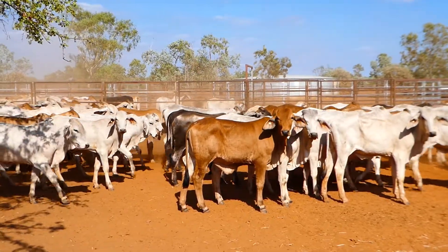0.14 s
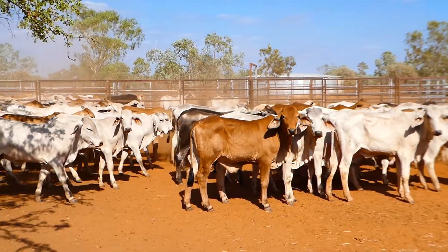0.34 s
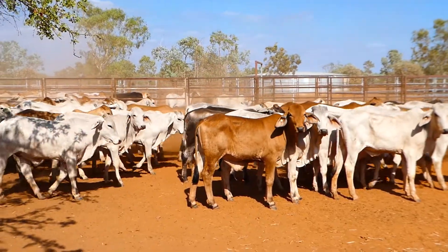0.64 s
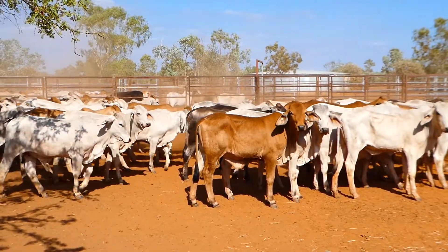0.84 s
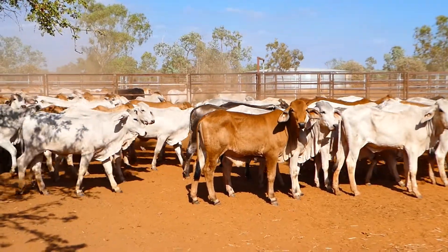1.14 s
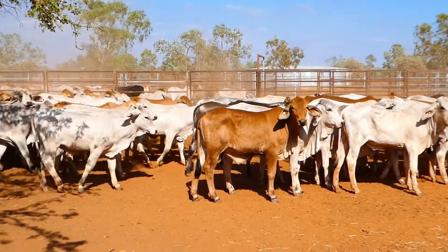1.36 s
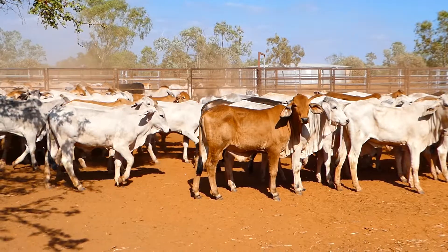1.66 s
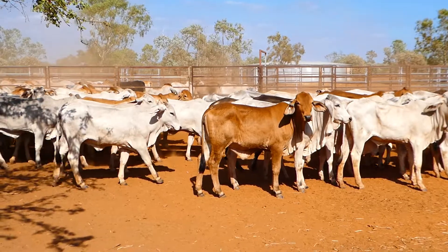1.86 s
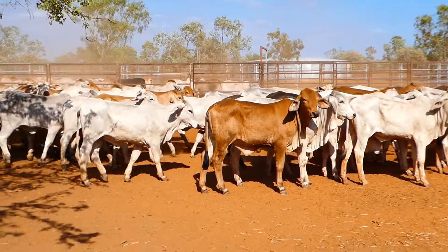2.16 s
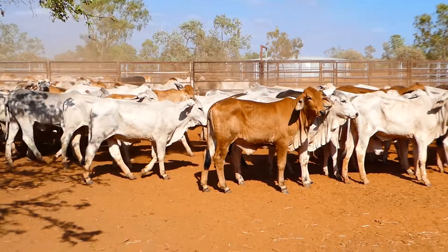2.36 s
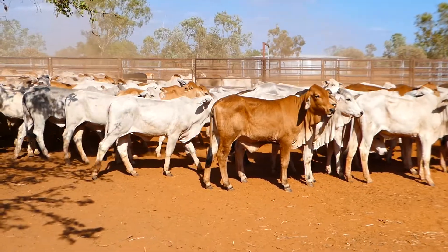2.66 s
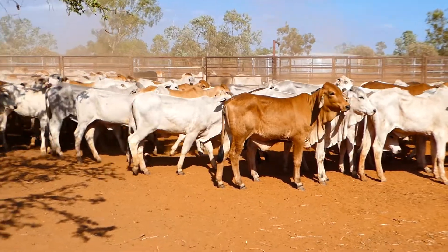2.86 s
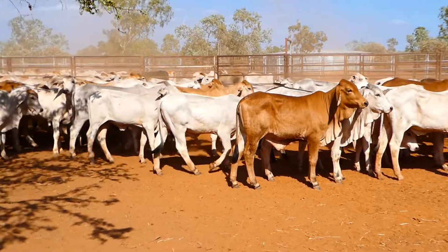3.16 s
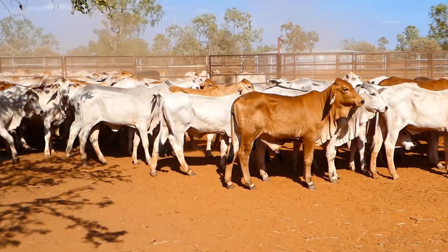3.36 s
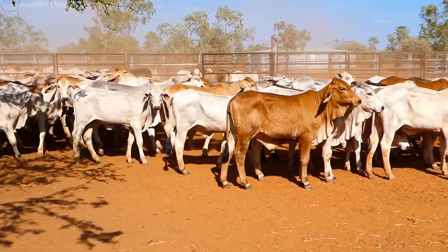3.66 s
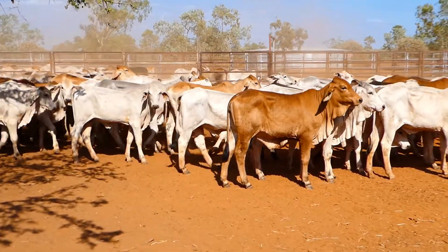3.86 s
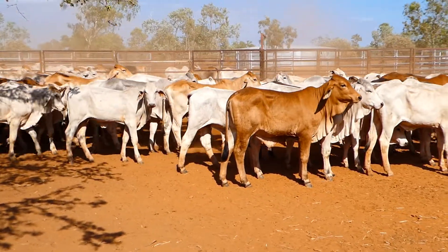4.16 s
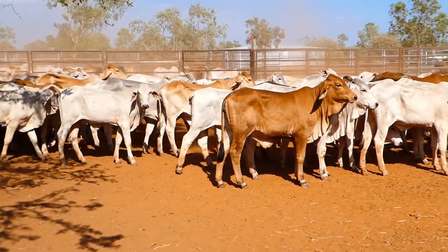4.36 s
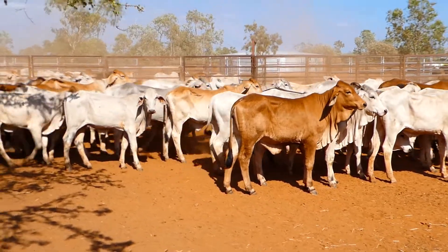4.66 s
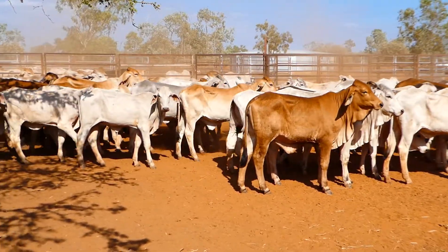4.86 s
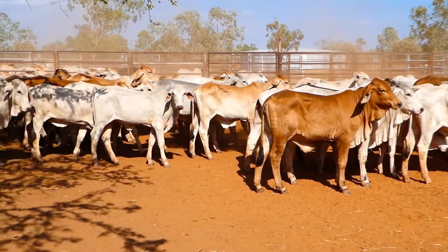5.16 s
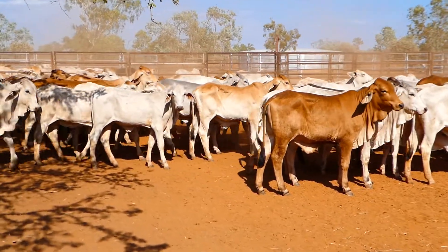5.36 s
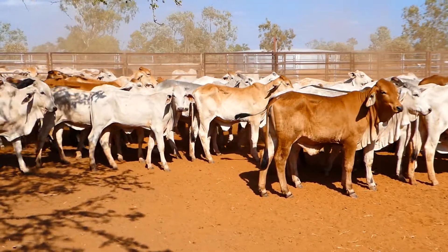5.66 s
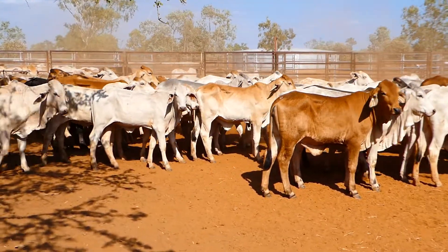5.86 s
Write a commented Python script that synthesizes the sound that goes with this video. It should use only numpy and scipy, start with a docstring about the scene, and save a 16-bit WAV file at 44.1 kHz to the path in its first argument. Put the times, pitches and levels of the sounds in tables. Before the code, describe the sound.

Four drawn-out moos follow one another in an open cattle yard, three near the microphone on the right and one farther ahead. The first is deep and falling, the distant one overlaps the loudest, which rises and drops, and the last fades to a low creak. Beneath them are light wind buffets, soft hoof scuffs in dirt, a few sharp hoof knocks and faint, distant bird chirps.

```python
"""Four cows low in a dirt yard, one call running into the next: three near on the right, one far ahead.
Each call is a train of vocal-fold pulses and breath ringing chest, mouth, upper throat and nose,
with echoes off flanks and fences. Gusts buffet the two microphone ports, hooves scuff and knock
on the ground, and small birds chirp far off over the faint hiss of the yard."""
import sys
import numpy as np
from scipy import signal
from scipy.fft import rfft, irfft, next_fast_len
from scipy.io import wavfile
from scipy.ndimage import uniform_filter1d

SR = 44100
rng = np.random.default_rng(int(sys.argv[2]) if len(sys.argv) > 2 else 0)


def output_pcm(signal):
    """Save a mono or channel-first signal as 16-bit PCM at the path in sys.argv[1].

    Samples are clipped to [-1, 1] before scaling.
    """
    pcm = np.clip(np.atleast_2d(signal).T, -1, 1) * 32767
    wavfile.write(sys.argv[1], SR, np.round(pcm).astype(np.int16))


N = 265482


def herd():
    """Three cows near the microphone on the right, one farther ahead, and their echoes."""
    # calls: (time [s], pitch [Hz], mouth level [dB], chest hum, upper throat, nasal rasp [dB over mouth],
    # higher mouth rings [dB over the lowest], lip spread raising the rings [%])
    long_call = [(.03, 76.9, -35, -2, -16.5, -44, -1.5, 7), (.16, 80.97, -33.5, 4.5, -16.5, -55, 2, 6),
                 (.3, 84.15, -32, -1, -15.5, -34, 0, 7), (.59, 84.77, -24, -7, -16, -26.5, -1.5, 6),
                 (.75, 82.3, -25.5, 3, -11, -23.5, 1, 6), (.83, 79.4, -19.5, -2.5, -17.5, -25.5, -0.5, 2.5),
                 (.93, 68.56, -20, -3, -15.5, -34.5, -2, 1.5), (1.06, 57.6, -20, -5, -22.5, -45, 0.5, 5.5),
                 (1.27, 53.98, -23, -4, -20.5, -35, -1.5, 2.5),
                 (1.45, 51.88, -24.5, -4.5, -24.5, -38, -2.5, 7),
                 (1.7, 50.56, -27.5, -2.5, -22.5, -33.5, 0.7, 6),
                 (1.96, 48.76, -28, -1.5, -24.5, -35.5, 1, -1.5),
                 (2.09, 47.77, -36.5, 4.5, -17, -26, 7, -0.5), (2.42, 44.43, -45, 12, -19, -44, 5.5, -1)]
    loud_call = [(2.651, 86.75, -21, -8.5, -28.5, -37, -5, 2),
                 (2.8, 100.8, -17.5, -5, -22.5, -38.5, -4, 0.7),
                 (2.94, 111.4, -18, -10, -16.5, -33, 2, -0.5),
                 (3.08, 120.1, -15, -11.5, -22, -36.5, -4, 0.2),
                 (3.22, 123.1, -17.5, -5, -10.5, -26.5, -0.1, -1),
                 (3.4, 124.3, -20, -3, -8.5, -25, 1.5, -1), (3.56, 122.3, -17, -5.5, -11, -26.5, -1, 0),
                 (3.74, 119, -14.5, -9, -19, -34.5, -2.2, 2), (3.82, 106.9, -17.5, -10, -18, -39, -0.7, 2),
                 (3.92, 80.5, -20, -7.5, -25, -41, -2.3, 1), (3.965, 65.3, -24, -11, -23, -56, -0.5, 1),
                 (4.04, 61.8, -31.5, 1.5, -16, -33, -6.5, -5.5)]
    last_call = [(3.96, 127.7, -34.5, 7, -10, -33, 6.5, -1.5), (4.06, 124.5, -29, 8.5, -9.5, -37, 8.5, 1),
                 (4.14, 119, -24.5, -0.5, -13.5, -38, 8.5, 2),
                 (4.26, 106.7, -31, 11.5, -13, -34.5, 5.5, -1.7),
                 (4.34, 98.85, -24, 3.5, -21.5, -31, 6, -3),
                 (4.45, 90.23, -22.5, -1, -20.5, -38, 2.5, -1.5),
                 (4.536, 83.3, -26, 4, -21.5, -30, 7.5, 1.5),
                 (4.694, 60.46, -32.5, 2, -20.5, -29, -0.5, -1),
                 (4.77, 55.04, -40.5, 11, -29, -49, -15, -0.32), (4.82, 54.64, -53, 8, -19, -46, -8, 1.5),
                 (4.87, 53.06, -41, 7, -13, -46, -2.5, 0.96), (5.138, 46.65, -55.5, 15.5, -21, -48, -5, 10),
                 (5.23, 41.2, -60, 6, -24, -48, 5, -2)]
    far_call = [(1.98, 96.6, -37, 4.2, -32, -36, .4, 0.37), (2.25, 108.1, -35, 1.3, -13, -37, 0.29, 0.5),
                (2.49, 104, -35.5, 9, -12.5, -33, 0.32, 0.49),
                (2.7, 107.2, -32.5, 1.2, -11, -25.5, .4, 0.47),
                (3.02, 112, -37, 5.4, -7.5, -19, 0.25, 0.35)]
    # rings of chest, mouth, upper throat and nose, a list each: (frequency [Hz], width [Hz], level [dB])
    long_throat = [
        [(314.6, 47.5, 5.5), (408, 115, -13)],
        [(684.7, 56, 25), (948, 105, 14), (1073, 98, 20), (1226, 124, 10), (1365, 67, 12.5)],
        [(1910, 140, 10.5), (2200, 800, 8), (2904, 67, 8.5)],
        [(3690, 210, 0.5), (4451, 950, -2.5), (5140, 440, -3), (6020, 309, -2)],
    ]
    loud_throat = [
        [(296.2, 59, -12.5)],
        [(792, 60, 8), (981.5, 170, 1), (1282, 137, -11.5)],
        [(2020, 260, -0.5), (2337, 119, 11.5), (2894, 237, -1)],
        [(3788, 370, 1), (4627, 200, 0), (5830, 740, 1), (6610, 140, 7), (9640, 1500, -12.5)],
    ]
    last_throat = [
        [(261, 85, -0.5), (338.5, 46.5, 17), (465, 39, 4)],
        [(678, 86, 12.5), (1013, 124, 2.9), (1227, 65, 1.3)],
        [(1850, 340, 16.7), (2064, 380, 12.6), (2530, 870, 10), (2870, 120, 1.5)],
        [(4480, 3400, 0)],
    ]
    far_throat = [
        [(338, 95, 9.5), (465, 62, -3)],
        [(767, 140, 0.018), (1046, 116, 0.031)],
        [(1445, 51, 17.6), (1892, 220, 11), (2294, 120, 2)],
        [(4350, 740, 0)],
    ]
    near, far = np.zeros(N), np.zeros(N)
    add(near, *moo(long_call, long_throat, sink=.15, slap=.2, breath=3.7, lip_db=.17, lip_rise=.45))
    add(near, *moo(loud_call, loud_throat, sink=.024, slap=.55, breath=1.44, lip_db=2.5, lip_rise=3.5))
    add(near, *moo(last_call, last_throat, sink=.175, slap=0, breath=3, lip_db=.5, lip_rise=1.1))
    add(far, *moo(far_call, far_throat, sink=.1, slap=0, breath=4.5, lip_db=3, lip_rise=-.2))
    return ports(flanks(near), rightness=.52) + ports(far, rightness=.056) + amp(-19) * fences(near + far)


def moo(call, throat, sink, slap, breath, lip_db, lip_rise, nose_hz=518.4, nose_width_hz=93):
    """Fold pulses and puffs of air ring chest, mouth, upper throat and nose; gives (start [s], sound)."""
    times, *columns = np.transpose(call)
    t = np.arange(times[0], times[-1], 1 / SR)
    hz, mouth_db, chest_db, upper_db, rasp_db, front_db, spread = (np.interp(t, times, c) for c in columns)
    hz = uniform_filter1d(hz, size=1500)
    slack = np.log2(hz.max() / hz)  # octaves under the top of the call
    cycles, rough, pulses, doubled = vocal_folds(t, hz, slack, slap)
    puffs = evened(np.exp(-(cycles % 1) / .5) * rng.standard_normal(len(t)))
    # rings sink as the pitch falls and rise as the lips spread
    chest, (low, *front), (*upper, (top_hz, top_width, top_db)), nose = throat
    lift = 1 + spread / 100
    low_hz = low[0] * lift * (1 - .26 * sink * slack)
    swung_hz = low_hz * (1 - .075 * slack * np.sin(2 * np.pi * cycles))  # slack folds swing this ring
    chest = [(f * (1 - sink * slack), w, g) for f, w, g in chest]
    mouth = [(swung_hz, *low[1:])] + [(f, w, g + front_db) for f, w, g in front]
    upper = [(f * (1 - .2 * sink * slack), w, g) for f, w, g in upper]
    upper.append((top_hz * (1 + lip_rise * spread / 100), top_width, top_db + lip_db * spread))
    nose = [(f * lift, w, g) for f, w, g in nose]
    # higher parts carry more breath, and tongue and lips never hold them still
    parts = [(chest, doubled, amp(chest_db), .015, 0, 1.95),
             (mouth, doubled, -1, .03, .004, 4.2),
             (upper, pulses, amp(upper_db), .11, .012, 3.3),
             (nose, pulses, amp(rasp_db), .4, .01, 1.8)]
    voice = np.zeros(len(t))
    for modes, folds, gain, air, wander, skirt in parts:
        drive = folds + (breath * air * (105 / hz) + 2.15 * rough) * puffs  # slow folds leak more air
        rings = 0
        for ring_hz, width, db in modes:
            level = amp(db + 140 * wander * drift(14, len(t)))
            wandering_hz = ring_hz * (1 + wander * drift(5, len(t)))
            rings += level * resonate(drive, wandering_hz, width, skirt, crest_s=.0012)
        voice += gain * evened(rings)
    # slack folds let the windpipe swallow a band just over the lowest mouth ring
    voice -= np.clip(3.2 * (slack - .25), 0, 1) * resonate(voice, 1.174 * low_hz, width=56)
    voice = rolloff(voice, "high", hz=190, order=2)  # the head radiates little bass
    nose_notch = signal.iirnotch(nose_hz, nose_hz / nose_width_hz, fs=SR)  # the nose swallows this band
    voice = signal.lfilter(*nose_notch, voice)
    fade = signal.windows.tukey(len(t), .014 / (times[-1] - times[0]))
    return times[0], amp(mouth_db) * voice * fade


def vocal_folds(t, hz, slack, slap, jitter=.0027, taut_octaves=.17):
    """Folds shut once a cycle; taut near the top pitch, they can slap again in mid-cycle."""
    flutter = slap * np.clip(1 - slack / taut_octaves, 0, 1) ** .5
    rough = np.clip(.17 * -np.gradient(np.log(hz)) * SR, 0, 1) ** 2  # folds lose step as pitch collapses
    cycles = np.cumsum(hz * (1 + (jitter + .1 * rough) * drift(66, len(t)))) / SR
    shut = np.flatnonzero(np.diff(np.floor(cycles))) + 1
    late = (cycles[shut] % 1) / (cycles[shut] - cycles[shut - 1])  # samples since the folds shut
    pulses = np.zeros(len(t) + 8)
    for k in range(8):
        offset = k - 4 + late
        pulses[shut + k] += np.sinc(offset) * np.cos(np.pi * offset / 10) ** 2
    # rough or twice-slapping folds close hard and soft by turns, and unevenly
    limp = rough + .24 * flutter * (1 + .5 * drift(5.6, len(t)))
    force = (1 + limp * np.cos(np.pi * np.floor(cycles))) * amp((.4 + 1.8 * rough) * drift(90, len(t)))
    pulses = pulses[4:-4] * np.sqrt(SR / hz) * force
    doubled = pulses + flutter * np.interp(t - .5 / hz, t, pulses)
    return cycles, rough, pulses, doubled


def flanks(x, treble_hz=1500):
    """Quick reflections between crowded, shifting bodies smear the treble of each pulse."""
    delay, t = np.arange(round(.031 * SR)) / SR, np.arange(N) / SR
    paths = rng.standard_normal((4, len(delay))) * np.exp(-delay / .012) * (delay > .001)
    paths = rolloff(paths / np.linalg.norm(paths[0]), "high", treble_hz, order=3)
    fades = [np.sin(np.pi * (t / .9 + k / 4)) ** 2 / np.sqrt(1.5) for k in range(4)]
    smear = sum(signal.oaconvolve(x * fade, path)[:N] for fade, path in zip(fades, paths))
    return .7 * x + .3 * rolloff(x, "low", treble_hz, order=3) + .4 * smear


def fences(x, t60=.16):
    """Scattered echoes off fences and flanks: sparse taps of random sign, dulled in the treble."""
    size = SR // 2
    taps = np.zeros((2, size))
    at = np.arange(400, size - 20, 20) + rng.integers(0, 20, (2, (size - 401) // 20))
    np.put_along_axis(taps, at, rng.choice([-1., 1.], at.shape), 1)
    decay = amp(-60 * np.arange(size) / SR / t60)
    taps = signal.lfilter([1], [1, -.7], taps * decay)
    return signal.fftconvolve(x[None], taps / np.linalg.norm(taps[0]), axes=1)[:, :N]


def ports(x, rightness):
    """Level and phase between the microphone ports part more, the farther right the source stands."""
    # shading of a source fully to the right: (frequency [Hz], left minus right [dB])
    shading = [(200, 3), (320, -0.5), (490, -1), (740, -9.5), (1130, -14.5), (1710, -24.5), (2600, -12),
               (5000, -13.5), (9000, -4.5)]
    # its phase across the ports: (frequency [Hz], left lead [rad])
    lead = [(100, 1), (400, -0.36), (860, -1.1), (1550, -0.36), (2760, -0.83)]
    size = next_fast_len(N)
    hz = np.fft.rfftfreq(size, 1 / SR)
    left = amp(rightness * curve(shading, hz) / 2) * np.exp(.5j * rightness * curve(lead, hz))
    return irfft(rfft(x, size) * np.array([left, 1 / left]), size)[:, :N]


def wind(likeness=.66, buffet_s=.0073):
    """Wind on the microphone: lumpy rumble, partly its own at each port, and buffets of a few cycles."""
    # breeze under the gusts: (time [s], level [dB])
    breeze = [(0, -51.5), (3.899, -50.5), (4.3, -73), (5.101, -72), (5.55, -62), (6.02, -43)]
    # gusts: (start [s], length [s], peak [dB])
    gusts = [(0.0, 0.12, -35.5), (0.174, 0.22, -34), (1.27, 0.46, -37.5), (1.977, 0.11, -49),
             (2.134, 0.23, -31), (2.36, 0.23, -28), (3.238, 0.24, -46), (5.544, 0.16, -52),
             (5.71, 0.33, -35.5)]
    # single buffets on the ports: (time [s], peak [dB], pitch [Hz], left minus right [dB])
    buffets = [(0.001, -26, 319, -19), (0.014, -18, 247, 5), (0.212, -9, 268, -0.5), (0.234, -16, 173, 8),
               (0.251, -14, 223, -3), (2.218, -20, 220, -11), (2.239, -19, 256, 12), (2.298, -18, 305, 0),
               (2.457, -22, 310, 0), (2.518, -22.5, 317, 2), (5.586, -28.5, 183, -2), (5.636, -35, 240, 0),
               (5.766, -25, 236, -5), (5.79, -23.5, 146, 5), (5.867, -26, 149, 9), (5.885, -12.5, 150, 0),
               (5.909, -21, 201, -6), (5.932, -19, 241, 8), (5.973, -21.5, 204, 5)]
    level = amp(np.interp(np.arange(N) / SR, *np.transpose(breeze)))
    for start, length, db in gusts:
        add(level, start, amp(db) * signal.windows.tukey(round(length * SR), .74))
    left, own = rng.standard_normal((2, N))
    right = likeness * left + np.sqrt(1 - likeness ** 2) * own
    rumble = np.array([resonate(port, hz=100, width=222) for port in (left, right)])
    rumble = rolloff(rumble, "high", hz=95, order=3)
    lumps = amp(5.5 * drift(19, N) + 7.5 * drift(22, (2, N)))
    out = evened(rumble * lumps) * level
    t = np.arange(0, 3 * buffet_s, 1 / SR)
    age = t / buffet_s
    swell = 3 * age * np.exp(1 - 3 * age)
    for (at, peak_db, hz, pan_db), (phase, lead) in zip(buffets, rng.random((len(buffets), 2))):
        port_phase = phase + lead * np.array([[0], [.38]])
        wave = np.sin(2 * np.pi * (hz * t * (1 - .034 * age) + port_phase))
        flap = resonate(rng.standard_normal(len(t)), 1.78 * hz, width=127)  # the edge of the gust flaps
        add(out, at, panned(peak_db, pan_db) * swell * (wave + .17 * evened(flap)))
    return out


def hoof_scuffs(air_hiss_db=-61.5, grains_per_s=400):
    """Hooves drag through gritty dirt over a steady, faint high hiss of air."""
    # drags: (start [s], level [dB], length [s])
    scuffs = [(0.973, -59, 0.057), (1.31, -59.5, 0.091), (1.483, -61, 0.044), (2, -68, 0.11),
              (2.456, -62, 0.069), (2.933, -58.5, 0.071), (3.688, -59, 0.061), (4.018, -71, 0.21),
              (4.418, -69, 0.21)]
    # spectrum of the scuffs and the hiss: (frequency [Hz], relative level [dB])
    spectrum = [(900, -47), (2500, -7.5), (5000, -5), (10000, -8), (13000, -11.5), (15500, -30.5)]
    level = np.full(N, amp(air_hiss_db))
    for start, db, length in scuffs:
        add(level, start, amp(db) * np.hanning(round(length * SR)) ** .5)
    grains = amp(3 * np.minimum(rng.exponential(1, N), 4)) * (rng.random(N) < grains_per_s / SR)
    grit = 1 + .15 * evened(signal.lfilter([1], [1, -.98], grains))
    return level * evened(hiss(spectrum, likeness=[(1000, .88), (6000, .69), (11000, .11)]) * grit)


def hoof_knocks():
    """Hooves strike hard ground, each ringing as a thud, a clack and a tick with a gritty tail."""
    # steps: (time [s], level [dB], thud, clack, tick [dB over that level], left minus right [dB])
    steps = [(0.289, -48, 3, -18, -11, 4), (1.7946, -26, 0, -8, -1.5, -4.0),
             (4.79, -33.5, -13, -7, -37, -1.5), (5.6744, -25, -34, -2.5, -13, 1.5),
             (5.8443, -36, 8, -39, -17, -3.5), (5.958, -41, 4, -7, -11, -0.5)]
    # thud, clack and tick rings: (frequency [Hz], width [Hz], gritty tail [share])
    hoof = [(970, 870, 0.27), (2620, 1700, 0.49), (9400, 2500, 0.043)]
    out, t = np.zeros((2, N)), np.arange(3000) / SR
    for at, level_db, *rings_db, pan_db in steps:
        noise, knock = rng.standard_normal(len(t)), 0
        for (hz, width, tail), db in zip(hoof, rings_db):
            blow = noise * (.6 * np.exp(-t / .0005) + tail * np.exp(-t / .012))
            blow[0] = 2  # the hard edge of the hoof lands first
            ring = resonate(blow, hz, width)
            knock += amp(db) * ring / abs(ring).max()
        add(out, at, panned(level_db, pan_db) * knock)
    return out


def birds():
    """Small birds far off: short gliding whistles, blurred by distance."""
    # chirps: (start [s], end [s], start pitch [Hz], end pitch [Hz], level [dB])
    chirps = [(2.845, 2.89, 3898, 3570, -48), (4.591, 4.636, 3780, 3546, -51),
              (4.613, 4.685, 3720, 4080, -58), (4.83, 4.906, 2950, 2490, -53),
              (5.347, 5.39, 4930, 6050, -63), (5.382, 5.418, 5900, 5200, -64)]
    out = np.zeros(N)
    for start, end, from_hz, to_hz, db in chirps:
        hz = np.linspace(from_hz, to_hz, round((end - start) * SR))
        blur = amp(db + 4 * drift(500, len(hz)))
        add(out, start, blur * np.sin(2 * np.pi * np.cumsum(hz) / SR) * np.hanning(len(hz)))
    return out + amp(-2.5) * fences(out, t60=.17)


def yard(level_db=-52):
    """The open yard: a faint, dull hiss all around the microphone."""
    # background spectrum: (frequency [Hz], relative level [dB])
    spectrum = [(40, -17), (200, -11), (500, -8), (950, -13.5), (2000, -18), (2900, -20), (4000, -30.5),
                (7000, -49)]
    # how alike the ports hear it: (frequency [Hz], likeness [0-1])
    likeness = [(60, 0.16), (400, 0.19), (2000, 0.57), (8000, 1)]
    return amp(level_db) * hiss(spectrum, likeness)


def hiss(spectrum, likeness):
    """Two-port noise with drifting patches of level."""
    frames, hz = N // 256 + 5, np.fft.rfftfreq(1024, 1 / SR)
    left_re, left_im, own_re, own_im, patches = rng.standard_normal((frames, 513, 5)).T
    patches = evened(uniform_filter1d(uniform_filter1d(patches, size=14, axis=0), size=10, axis=1))
    shared = curve(likeness, hz)[:, None]
    left = left_re + 1j * left_im
    right = shared * left + np.sqrt(1 - shared ** 2) * (own_re + 1j * own_im)
    bins = np.array([left, right]) * amp(curve(spectrum, hz)[:, None] + 1.2 * patches)
    return evened(signal.istft(bins, nperseg=1024, noverlap=768)[1][:, :N])


def resonate(x, hz, width, skirt=1, crest_s=0):
    """A ring at hz that crests crest_s after the blow; a wide skirt speaks at once and rings long."""
    carrier = np.exp(2j * np.pi * np.cumsum(hz * np.ones(len(x))) / SR)
    slow, fast = np.exp(-np.pi * width / SR * np.array([1 / np.sqrt(skirt), skirt]))
    envelope = signal.lfilter([(1 - slow) * (1 - fast)], [1, -slow - fast, slow * fast], x / carrier)
    return 2 * (carrier * np.exp(-2j * np.pi * hz * crest_s) * envelope).real


def drift(hz, shape):
    """Slow chance: noise smoothed down to about hz."""
    size = max(int(SR / hz), 2)
    return evened(uniform_filter1d(uniform_filter1d(rng.standard_normal(shape), size), size))


def rolloff(x, passes, hz, order):
    return signal.sosfilt(signal.butter(order, hz, passes, fs=SR, output="sos"), x)


def amp(db):
    return 10 ** (np.asarray(db) / 20)


def panned(db, pan_db):
    return amp(db + np.array([[pan_db], [-pan_db]]) / 2)


def evened(x):
    return x / np.sqrt(np.mean(x ** 2) + 1e-20)


def curve(points, hz):
    point_hz, value = np.transpose(points)
    return np.interp(np.log(hz + 1), np.log(point_hz + 1), value)


def add(mix, start_s, sound):
    part = mix[..., round(start_s * SR):][..., :sound.shape[-1]]
    part += sound[..., :part.shape[-1]]


def scene():
    """The herd and its yard as they reach the two ports."""
    return herd() + wind() + hoof_scuffs() + hoof_knocks() + birds() + yard()


def record(dry):
    """Bass roll-off of the microphone, then the band limit."""
    thin = rolloff(dry, "high", hz=70, order=2)
    band_limit = signal.firwin(511, 15400, window=("kaiser", 9), fs=SR)
    return signal.oaconvolve(thin, band_limit[None], "same")


dry = scene()
out = record(dry)
output_pcm(out)
```